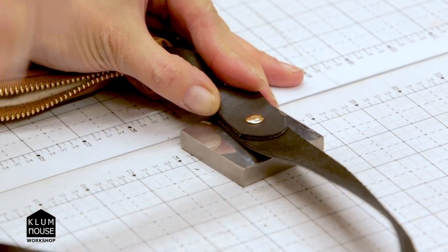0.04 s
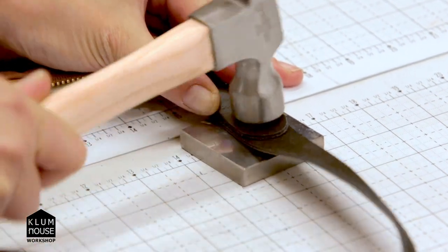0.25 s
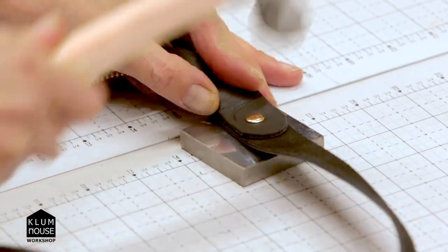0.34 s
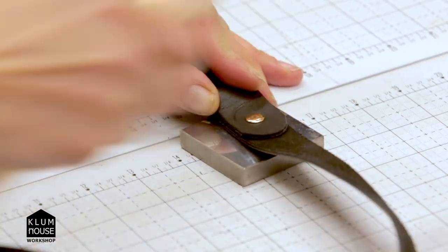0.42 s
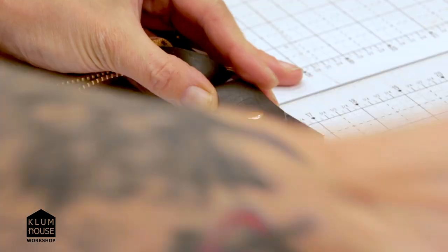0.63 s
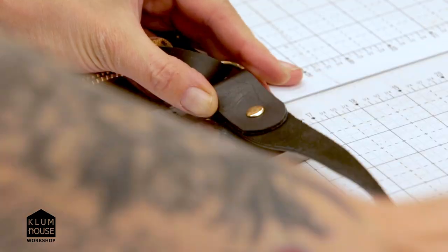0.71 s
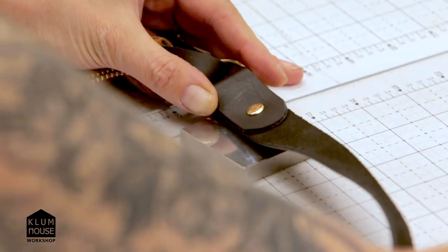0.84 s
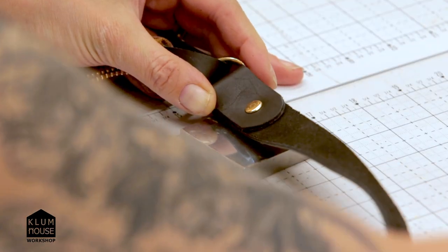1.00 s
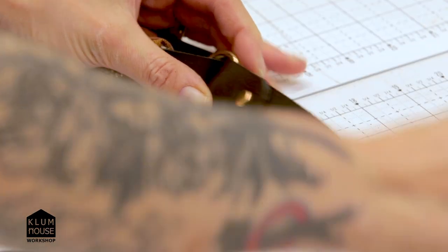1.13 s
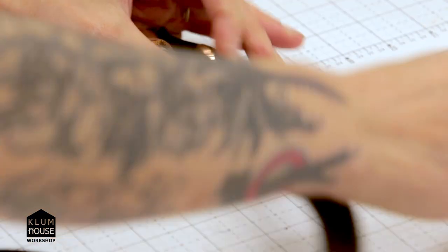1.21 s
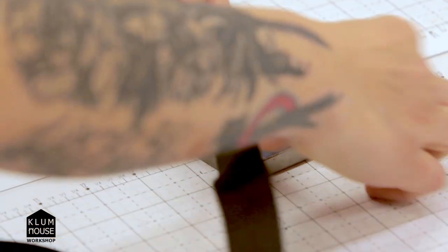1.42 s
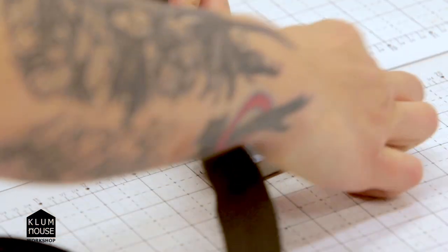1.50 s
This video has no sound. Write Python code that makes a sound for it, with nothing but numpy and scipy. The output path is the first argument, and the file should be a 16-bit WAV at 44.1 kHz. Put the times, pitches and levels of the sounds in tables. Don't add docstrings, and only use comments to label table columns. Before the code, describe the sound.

A hammer strikes a rivet through leather on a steel block, then is laid down in knocks

```python
import sys
import numpy as np
from scipy import signal
from scipy.fft import rfft, irfft, next_fast_len
from scipy.io import wavfile
from scipy.ndimage import uniform_filter1d

SR = 44100
rng = np.random.default_rng(int(sys.argv[2]) if len(sys.argv) > 2 else 0)


def convert_level_to_amplitude(level_db):
    exponent = np.asarray(level_db, float) / 20
    return 10 ** exponent


def pcm_store(signal):
    levels = np.round(np.clip(np.atleast_2d(signal), -1, 1) * 32767)
    wavfile.write(sys.argv[1], SR, levels.astype(np.int16).T)


N = 68355
LEAD = SR // 2

# f/Hz, density/dB
AIR_SPECTRUM = [(12, -27.5), (20, 0.5), (91, -13), (127, -9.5), (158, -16), (198, -11), (248, -24.5),
                (802, -24.5), (16000, -67)]
# t/s, level/dB
HAND_MOVEMENT = [(0, -1), (0.502, -3), (0.799, 2), (1.2, 5), (1.4, 6.5), (1.55, 9.5)]
# t/s, level/dB
SLEEVE_HISS = [(0, -108), (.95, -104), (1.1, -83), (1.35, -81), (1.55, -75.5)]
AIR_DB, SLEEVE_HZ = -64, 3980
MIC_HISS_DB, MIC_TOP_HZ, QUIET_TOP_HZ = -84, 11000, 11950

# f/Hz, density/dB
ROOM_SPECTRUM = [(18, -54.5), (30, -19), (59, -6), (128, -18), (223, -5.5), (497, -7), (1620, -17),
                 (12000, -61.5), (15600, -95.5), (22000, -120)]
# f/Hz, T60/s
ROOM_T60 = [(60, 0.96), (300, 0.64), (1500, 0.8), (8000, 0.26)]
ROOM_DB, ROOM_RISE_S = -17, 0.057

# t/s, f/Hz, level/dB
SQUEAK = [
    (1.37, 11600, -93),
    (1.408, 13550, -85),
    (1.456, 14550, -79),
    (1.476, 15100, -87),
    (1.495, 15700, -87),
    (1.55, 15550, -82),
]
# t/s, level/dB
RUSTLE = [(1.2, -93.5), (1.4, -79.5), (1.46, -76), (1.5, -74), (1.55, -74)]
RUSTLE_HZ = 5000
TICK_S, TICK_DB, TICK_HZ = 1.3472, -60, 3000

# t/s, level/dB, contact time/s, click level/dB, ring length factor
KNOCKS = [
    (0.8866, -40, 0.00019, -21, 1.02),
    (.9802, -36, 0.00011, -42, 0.85),
    (1.074, -36.5, 0.000077, -7, 1.12),
]
# f/Hz, level/dB, T60/s
KNOCK_MODES = [
    [(150, -8, .6), (314.6, -9, 0.26), (497, -22, 0.16), (647, -3.5, 0.17), (836, -12, 0.079),
     (1970, -18, 0.036)],
    [(184, 5.5, 0.26), (315, 3, 0.36), (400, -10, .15), (497, 12.5, 0.077), (840, 13.5, 0.093),
     (1084, 12, 0.066), (2490, 10, 0.016)],
    [(154.2, -3, 0.35), (339.7, 2.5, 0.17), (392, -2, 0.21), (590, -7.5, 0.17), (1056, 9.5, 0.037),
     (1400, -1, .1), (2450, 2, 0.0083)],
]
# f/Hz, density/dB
KNOCK_SPECTRUM = [(30, -30), (150, -4.5), (340, -2.5), (600, -1), (1550, -9), (1850, -18), (2500, -19),
                  (4000, -33), (10000, -34)]
# f/Hz, T60/s
KNOCK_T60 = [(60, .2), (155, 0.39), (500, 0.16), (1500, 0.26), (2200, 0.15), (8000, 0.36)]
# f/Hz, level/dB, T60/s
SNAP_MODES = [(2306, -1.5, .012), (2520, -2.5, 0.018), (3530, -6, 0.008)]
SNAP_DB = [
    -30,
    -28.5,
    -19.5,
]
KNOCK_MODES_DB, KNOCK_ROOM_DB = -1, -19

# t/s, click level/dB
HOPS = [
    (.243, -57.5),
    (0.2777, -34),
    (.3145, -36.5),
    (0.343, -44),
]
# t/s, f/Hz, level/dB, T60/s
STEEL_RINGS = [(.234, 14250, -57, .5), (.245, 14250, -64, .1), (.345, 14250, -80, .3),
               (.262, 10430, -72, .3), (.279, 10200, -60, .09), (.300, 10430, -63, .45),
               (.315, 10200, -70, .3), (.300, 7079, -68, .15), (.32, 12210, -84, .5),
               (.344, 15590, -83, .2)]
HOP_HZ, HOP_T60_S = 4000, 0.049
LAND_S, SEAT_S, SETTLE_S = .278, .0015, 0.36

# t/s, level/dB
BLOWS = [
    (-.33, -16),
    (0.2144, -21.5),
]
# t/s after first touch, level/dB
CHATTER = [(-.0003, -9), (.0020, 3), (.004, 6.5), (.0075, -7), (.013, -5.5), (.017, -3)]
# f/Hz, level/dB, T60/s
TABLE_MODES = [(230.8, -9, 5.0), (393, -26, 1.1), (505, -3, 0.51), (639, -3, 0.37), (807, -8.5, 0.35),
               (866, -9, 0.46), (1158, -6, 0.098), (1418, -25.5, 0.38), (1412, -7, 0.22), (1638, 7, 0.064),
               (2202, -36, 0.76), (2369, -17, 0.068)]
# f/Hz, level/dB, T60/s
THUMP_MODES = [(38.2, -9, 0.076), (65, 0, .12), (90, -2.5, 0.1), (146.1, -1.5, 0.38), (241.6, -2.5, 0.36),
               (282.5, 1, 0.9), (660, -1, .1)]
# f/Hz, density/dB
BOOM_SPECTRUM = [(30, -6.5), (160, 2), (940, -5), (1320, -13), (1600, -12), (3400, -37), (8000, -48),
                 (16000, -59.5)]
# f/Hz, T60/s
BOOM_T60 = [(40, 0.05), (80, .25), (250, 0.32), (1000, 0.34), (5000, .45), (12000, .3)]
# f/Hz, density/dB
CRACK_SPECTRUM = [(300, -7.5), (1200, 2.5), (2200, -3.5), (3800, -15), (5000, -25), (7500, -24),
                  (11000, -32.5), (15500, -29.5)]
# f/Hz, T60/s
CRACK_T60 = [(1000, 0.15), (4000, .04), (12000, .1)]
TABLE_DB, THUMP_DB, BOOM_DB, CRACK_DB = 2, -3, 7, -9
TABLE_DAMP, BLOW_PUSH_S, THUMP_PUSH_S, THUMP_LAG_S = 0.31, .00012, .0004, 0.0031

CEILING, TOP_HZ = .78, 15850


def unit(x):
    return x / np.sqrt(np.sum(x ** 2) / SR * 20)


def read(table, hz):
    a = np.array(table, float)
    return np.interp(np.log(hz), np.log(a[:, 0]), a[:, 1])


def curve(table, t):
    return np.interp(t, *np.array(table).T)


def filtered_noise(band_hz, kind):
    return signal.lfilter(*signal.butter(1, band_hz, kind, fs=SR), rng.standard_normal(N))


def walk(rate):
    k = int(SR / rate)
    steps = np.repeat(rng.standard_normal(N // k + 1), k)
    return 1.3 * uniform_filter1d(uniform_filter1d(steps, k), k)[:N]


def bands(n, colour, envelope):
    f = np.maximum(np.fft.rfftfreq(n, 1 / SR), 1)
    z = rfft(rng.standard_normal(n)) * convert_level_to_amplitude(read(colour, f))
    out = np.zeros(n)
    for hz in 20 * 2 ** (np.arange(21) / 2):
        weight = np.clip(1 - abs(2 * np.log2(f / hz)), 0, 1)
        out += irfft(z * weight, n) * envelope(hz)
    return out


def tail(colour, t60, rise_s, size=2 ** 14):
    t = np.arange(size) / SR
    decaying = bands(size, colour, lambda hz: np.exp(-np.log(1000) * t / read(t60, hz)))
    return unit(decaying * (1 - np.exp(-t / rise_s)))


def modes(table, damp):
    t, out = np.arange(2 ** 14) / SR, 0
    for hz, db, t60 in table:
        out = out + convert_level_to_amplitude(db - 60 * t / (min(t60, .5) * damp)) * np.sin(2 * np.pi * hz * t)
    return unit(out)


def push(rows, width_s):
    x, pole = np.zeros(N + LEAD), np.exp(-1 / (width_s * SR))
    for s, gain in rows:
        x[LEAD + int(round(s * SR))] += gain
    return signal.lfilter([(1 - pole) ** 2], [1, -2 * pole, pole ** 2], x)


def ring(force, body):
    return signal.fftconvolve(force, body)[LEAD:LEAD + N]


def click(at_s, db, hz, t60):
    t = np.arange(N) / SR - at_s
    band = signal.butter(2, [hz / 2, min(hz * 1.16, 2e4)], "band", fs=SR)
    z = signal.lfilter(*band, rng.standard_normal(N))
    return z * (t > 0) * convert_level_to_amplitude(db - 60 * np.maximum(t, 0) / t60)


def air():
    n, t = next_fast_len(N), np.arange(N) / SR
    tone = bands(n, AIR_SPECTRUM, lambda hz: np.resize(convert_level_to_amplitude(2.0 * walk(2.2) * (hz < 2000)), n))[:N]
    sleeve = filtered_noise(SLEEVE_HZ, "high") * convert_level_to_amplitude(curve(SLEEVE_HISS, t))
    mic = convert_level_to_amplitude(MIC_HISS_DB) * filtered_noise([3000, MIC_TOP_HZ], "band")
    top = signal.ellip(6, .5, 25, QUIET_TOP_HZ, fs=SR, output="sos")
    tone, mic = signal.sosfilt(top, tone), signal.sosfilt(top, mic)
    return tone / tone.std() * convert_level_to_amplitude(AIR_DB + curve(HAND_MOVEMENT, t)) + sleeve + mic


def strap():
    t = np.arange(N) / SR
    times, pitch, level = np.array(SQUEAK).T
    hz = np.interp(t, times, pitch) * (1 + .006 * walk(300))
    squeak = np.sqrt(2) * np.sin(2 * np.pi * np.cumsum(hz) / SR)
    squeak = squeak * convert_level_to_amplitude(np.interp(t, times, level) + 2.3 * walk(80)) * (t > times[0])
    rustle = filtered_noise([RUSTLE_HZ / 2, RUSTLE_HZ * 2], "band")
    rustle = rustle * convert_level_to_amplitude(curve(RUSTLE, t) + 2.0 * walk(40))
    return squeak + rustle + click(TICK_S, TICK_DB, TICK_HZ, 0.033)


def knocks(room):
    out, forces = 0, 0
    for (s, db, width, edge_db, long), wood, snap_db in zip(KNOCKS, KNOCK_MODES, SNAP_DB):
        t60 = [(hz, seconds * long) for hz, seconds in KNOCK_T60]
        body = tail(KNOCK_SPECTRUM, t60, 0.0001) + convert_level_to_amplitude(KNOCK_MODES_DB) * modes(wood, 1)
        force = push([(s, convert_level_to_amplitude(db))], width)
        snap = ring(push([(s, convert_level_to_amplitude(db + 2 + snap_db))], .00004), modes(SNAP_MODES, 1))
        out = out + ring(force, body) + snap + click(s, db + edge_db, 3900, 0.11)
        forces = forces + force * long ** 3
    out = out + convert_level_to_amplitude(KNOCK_ROOM_DB) * ring(forces, room)
    return signal.lfilter(*signal.butter(1, 70, "high", fs=SR), out)


def block():
    t, out = np.arange(N) / SR, 0
    landed = np.clip((t - LAND_S) / .01, 0, 1)
    for s, hz, db, t60 in STEEL_RINGS:
        age = np.maximum(t - s, 0)
        choke_db = 9 * landed * (s < LAND_S)
        size = convert_level_to_amplitude(db - 60 * age / t60 - choke_db) * (1 - np.exp(-age / SEAT_S))
        phase = 2 * np.pi * np.cumsum(hz * (1 + 0.0024 * walk(130))) / SR
        out = out + size * convert_level_to_amplitude(3.4 * walk(120)) * np.sin(phase)
    out = out * convert_level_to_amplitude(-200 * np.maximum(t - SETTLE_S, 0))
    return out + sum(click(s, db, HOP_HZ, HOP_T60_S) for s, db in HOPS)


def hammer(room):
    hits = []
    for s, db in BLOWS:
        for k, (delay, rel_db) in enumerate(CHATTER):
            hits.append((s + delay, (-1) ** k * convert_level_to_amplitude(db + rel_db)))
    blow = [(s + .001, convert_level_to_amplitude(db)) for s, db in BLOWS]
    late = [(s + THUMP_LAG_S, gain) for s, gain in blow]
    instant = .5 / SR
    boom = tail(BOOM_SPECTRUM, BOOM_T60, 0.0025)
    wide = np.pad(boom, (0, len(room) - len(boom))) + convert_level_to_amplitude(ROOM_DB) * room
    out = convert_level_to_amplitude(BOOM_DB) * ring(push(blow, instant), wide)
    out += convert_level_to_amplitude(CRACK_DB) * ring(push(hits, instant), tail(CRACK_SPECTRUM, CRACK_T60, .0002))
    out += convert_level_to_amplitude(THUMP_DB) * ring(push(late, THUMP_PUSH_S), modes(THUMP_MODES, 0.99))
    return out + convert_level_to_amplitude(TABLE_DB) * ring(push(hits, BLOW_PUSH_S), modes(TABLE_MODES, TABLE_DAMP))


def scene():
    room = tail(ROOM_SPECTRUM, ROOM_T60, ROOM_RISE_S, size=2 ** 16)
    return (air() + strap() + knocks(room) + block() + hammer(room))[None]


def roll_off(x):
    return signal.sosfilt(signal.butter(12, 16420, fs=SR, output="sos"), x)


def record(dry):
    rounded = CEILING * np.tanh(dry / CEILING)
    mix = signal.sosfilt(signal.ellip(6, .3, 30, TOP_HZ, fs=SR, output="sos"), rounded)
    return roll_off(mix)


dry = scene()
out = record(dry)
pcm_store(out)
```